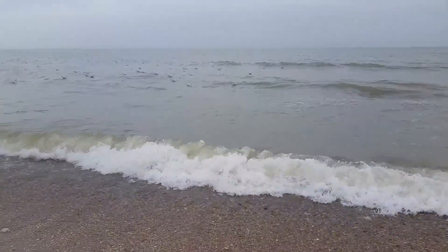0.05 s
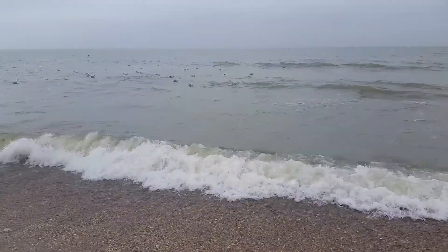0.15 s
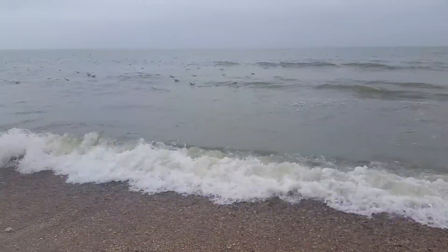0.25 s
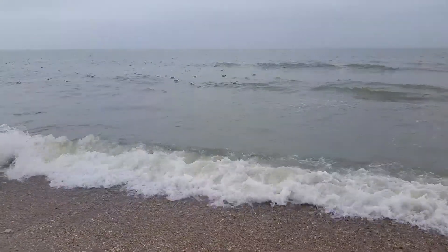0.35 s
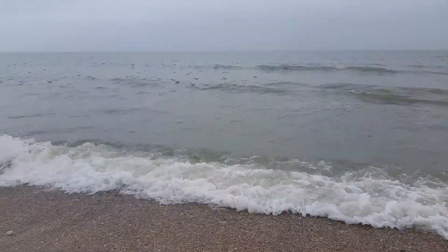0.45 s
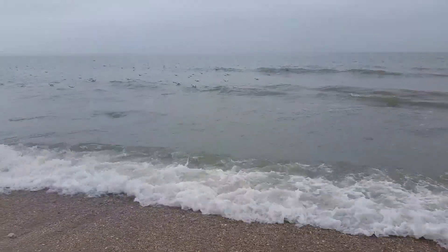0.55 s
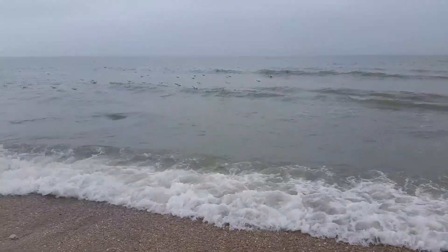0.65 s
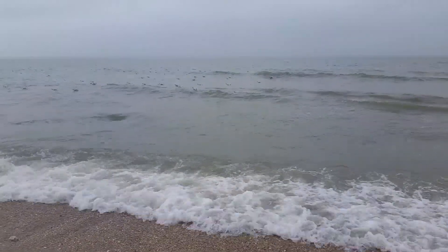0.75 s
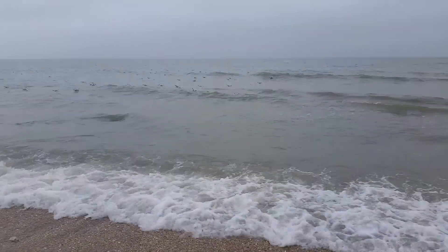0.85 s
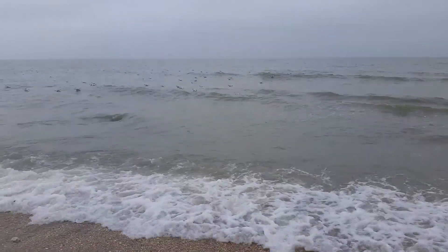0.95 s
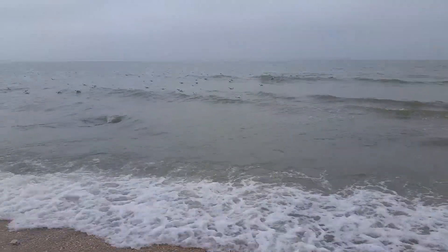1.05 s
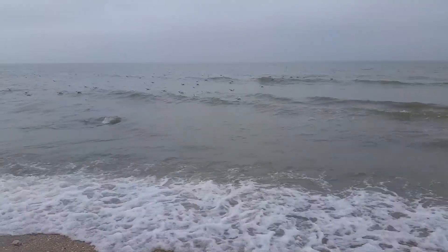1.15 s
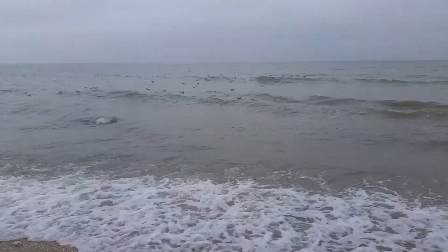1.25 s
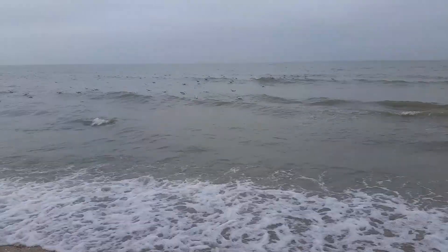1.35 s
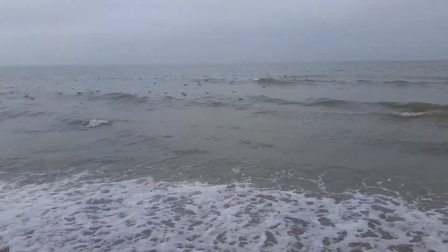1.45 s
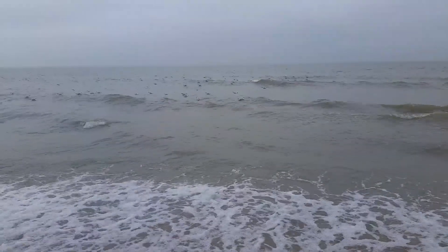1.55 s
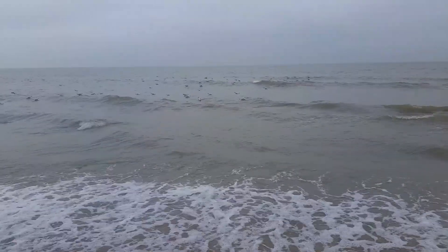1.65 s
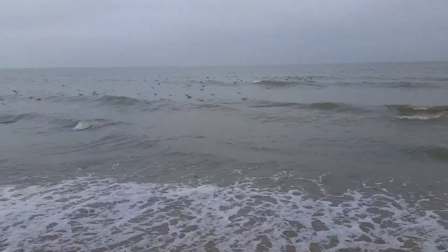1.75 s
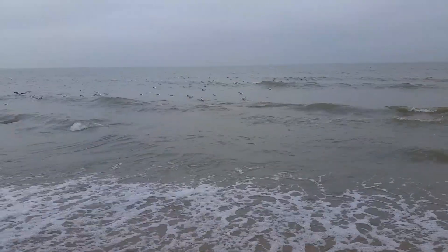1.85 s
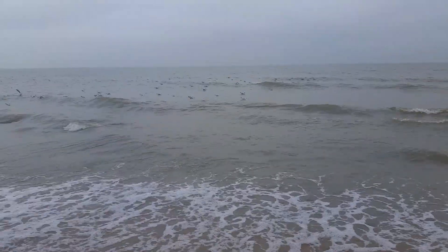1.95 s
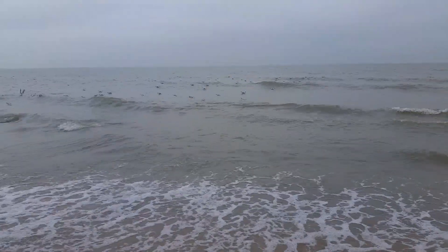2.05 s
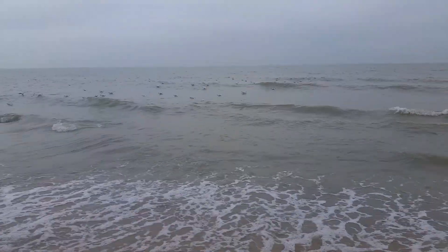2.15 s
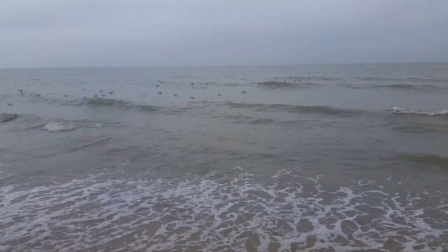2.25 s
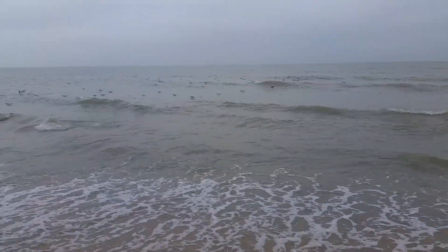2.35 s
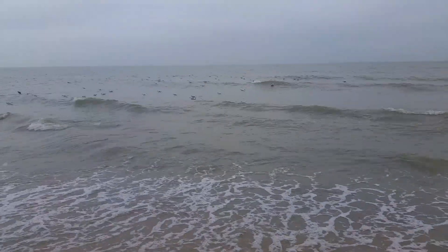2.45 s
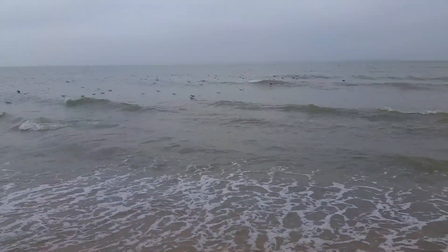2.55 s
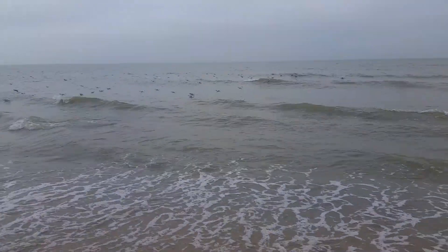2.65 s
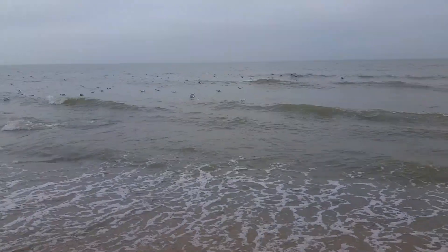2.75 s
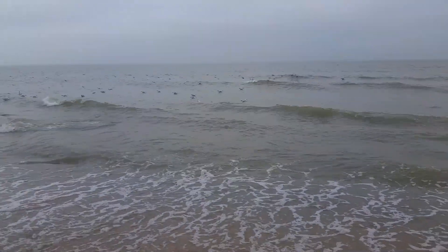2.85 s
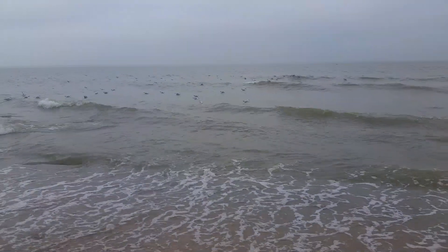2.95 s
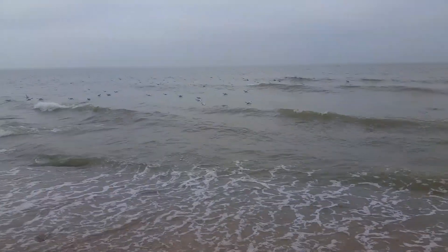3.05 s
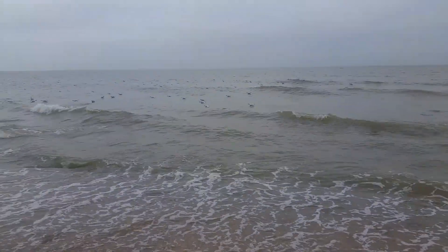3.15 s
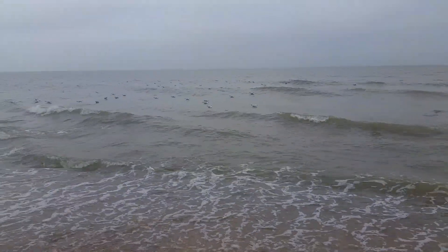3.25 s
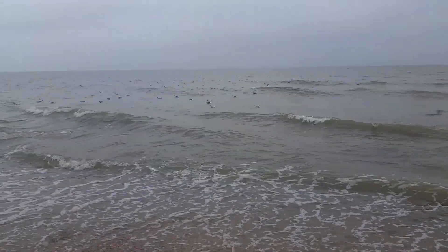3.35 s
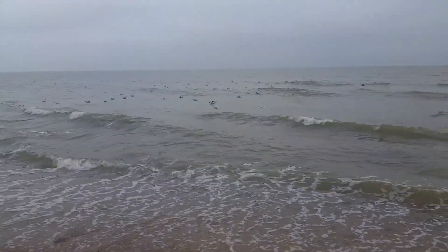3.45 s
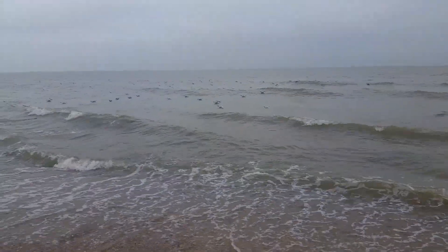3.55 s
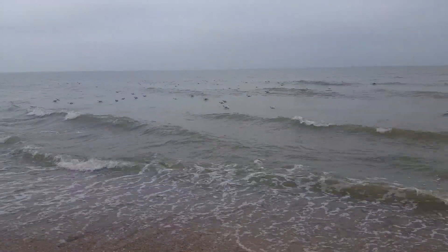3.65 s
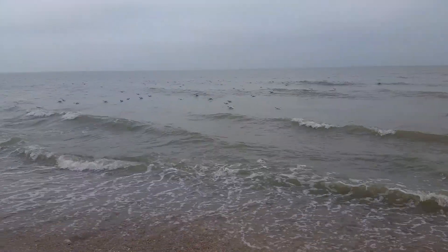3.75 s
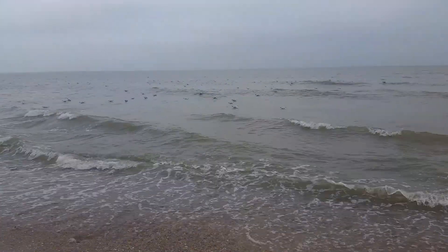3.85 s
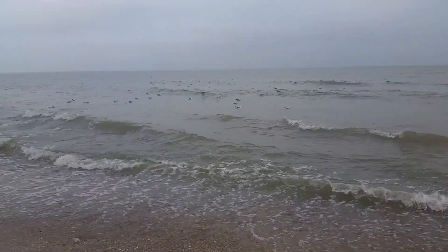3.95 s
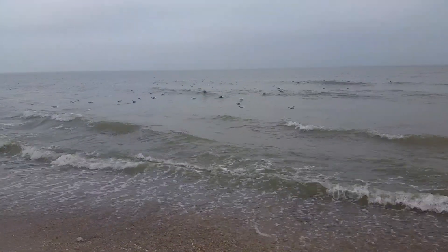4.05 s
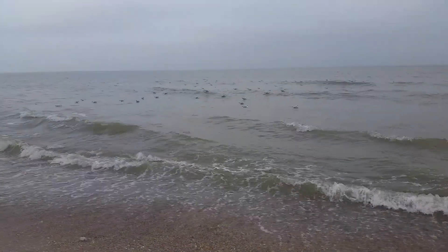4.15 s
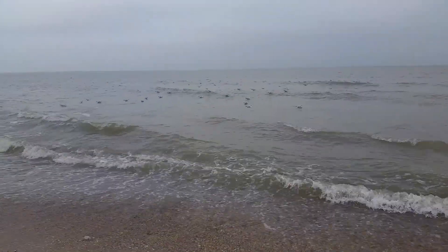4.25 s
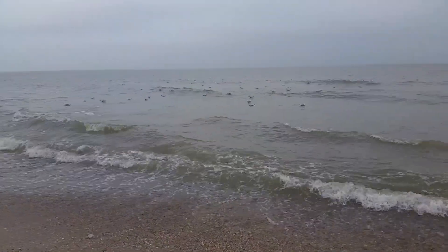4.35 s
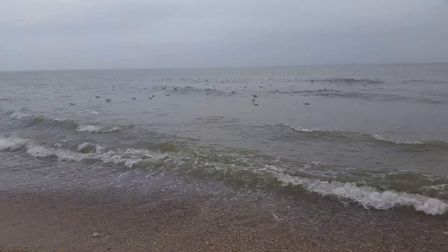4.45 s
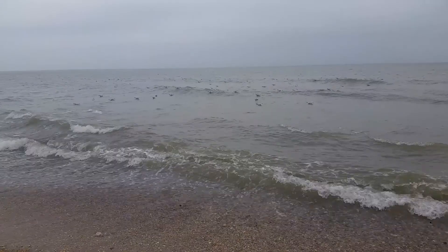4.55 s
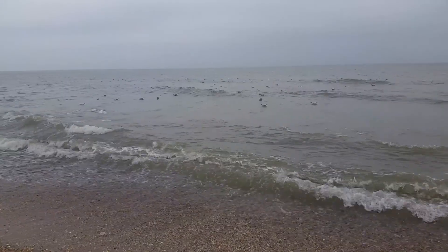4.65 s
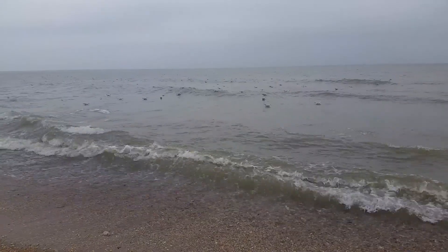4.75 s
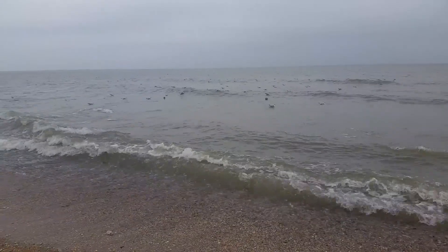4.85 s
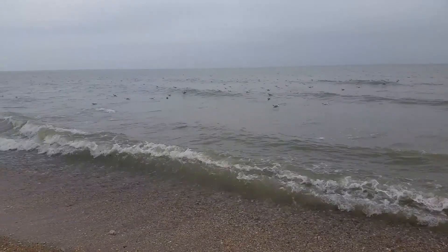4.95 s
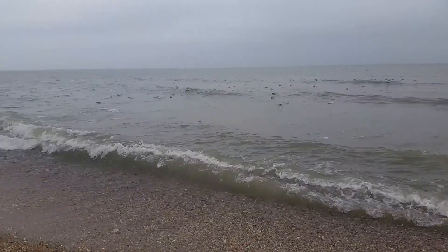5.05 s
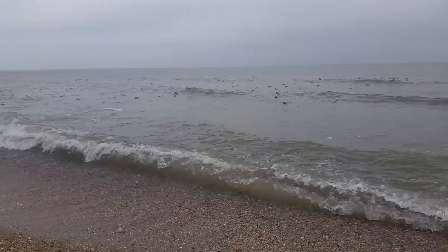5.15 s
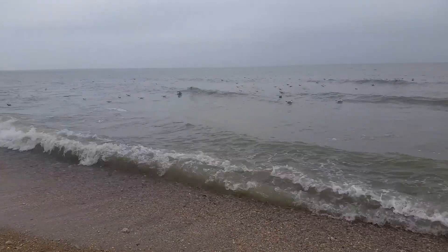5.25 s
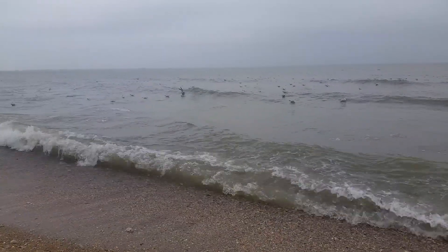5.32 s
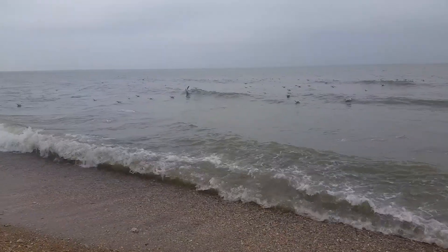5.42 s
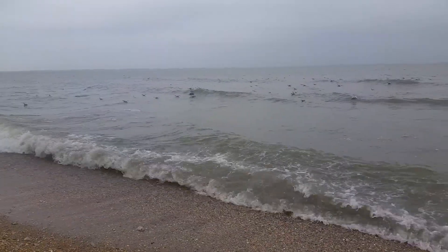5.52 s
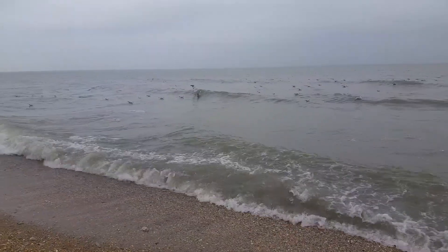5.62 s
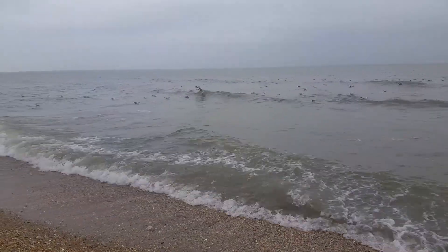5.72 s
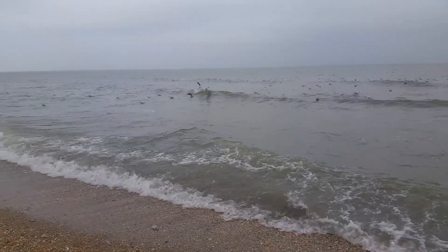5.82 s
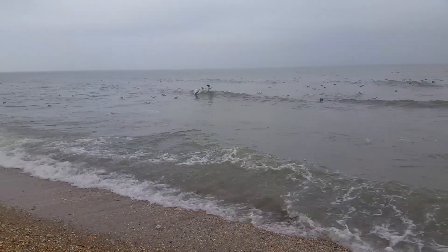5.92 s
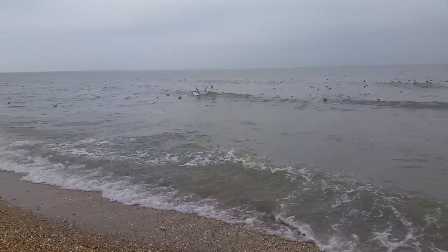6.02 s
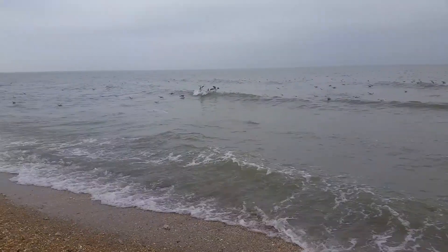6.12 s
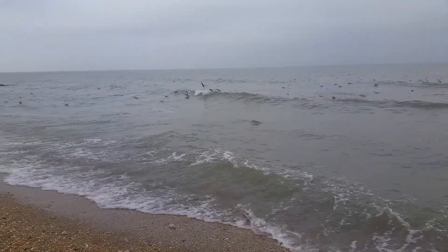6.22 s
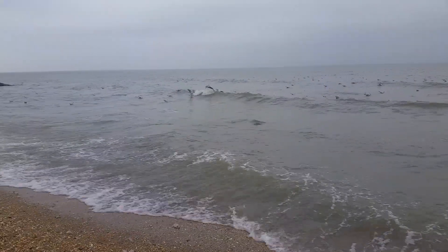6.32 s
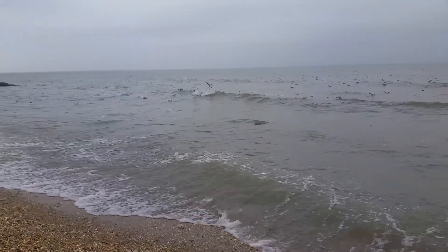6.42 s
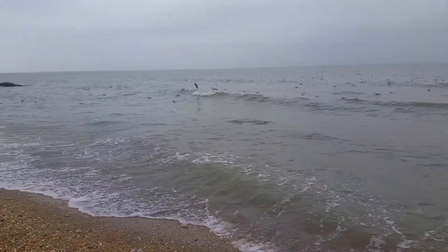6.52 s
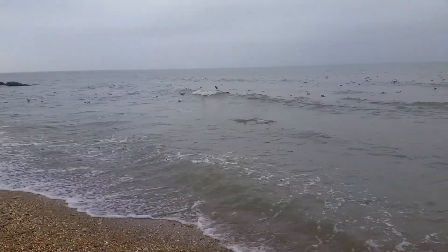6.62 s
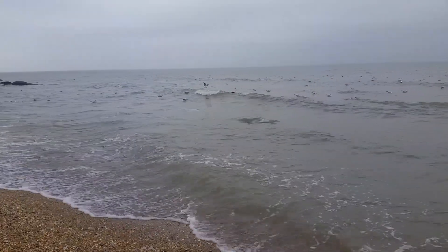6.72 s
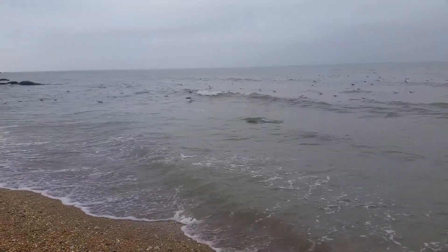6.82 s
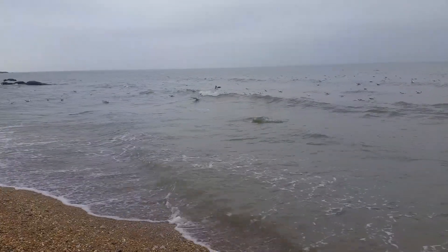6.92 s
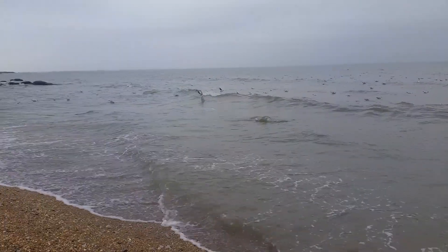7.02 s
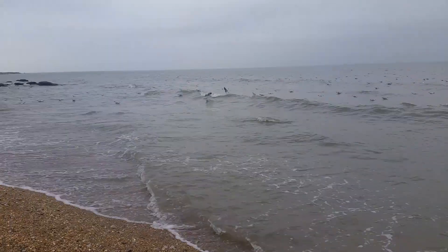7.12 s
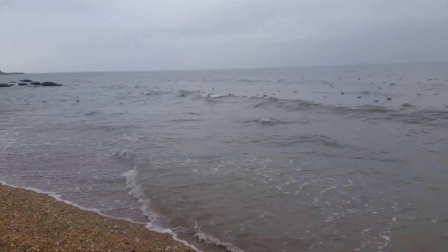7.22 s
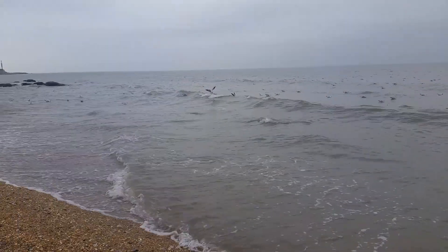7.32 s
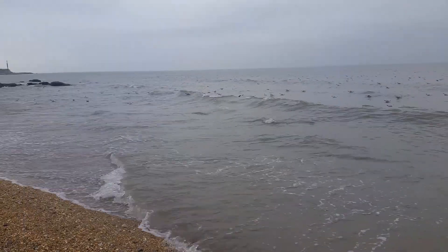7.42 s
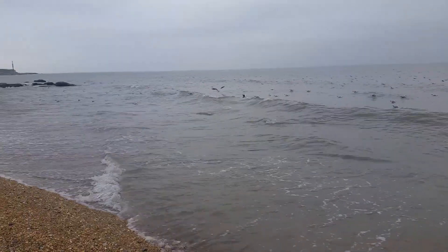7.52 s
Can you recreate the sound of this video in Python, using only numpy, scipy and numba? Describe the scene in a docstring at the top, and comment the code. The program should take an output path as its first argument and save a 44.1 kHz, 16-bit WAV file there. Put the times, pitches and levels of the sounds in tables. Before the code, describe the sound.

Small waves break on a shell and pebble beach, heard close on a hand-held phone. The first collapses with a low boom and splash, then runs out as fizzing foam. After a lull, a second builds and breaks, and a third laps in. Shells tick in the wash and gravel rattles as the water draws back. Wind rises in the second half, buffeting the microphone with low rumbles and thumps.

```python
"""Small waves break on a shell and pebble beach: one collapses and runs out as foam, a second builds
and breaks, a third laps in. Clouds of ringing bubbles roar, splash and fizz; shells tick in the swash
and gravel rattles as the water draws back. A hand-held phone hears it through two ports, the left one
muffled, while a rising wind buffets each port with its own eddies."""
import sys
import numpy as np
from scipy import signal
from scipy.fft import rfft, irfft, next_fast_len
from scipy.io import wavfile
from scipy.ndimage import uniform_filter1d, minimum_filter1d
from numba import njit

SR = 44100
rng = np.random.default_rng(int(sys.argv[2]) if len(sys.argv) > 2 else 0)


def to_wav(s):
    """Save 16-bit WAV."""
    ch = np.atleast_2d(s).T  # columns
    pcm = np.round(np.clip(ch, -1, 1) * 32767)  # PCM
    wavfile.write(sys.argv[1], SR, pcm.astype(np.int16))


N = 334278
LAPPING_DB = -47  # the calm water that the waves are set against


def surge(foam):
    """Decibels by which water or foam rises over the calm; each wave builds and ebbs exponentially."""
    # Waves reaching the shore. Each row: peak time in seconds, level in dB, build-up and run-out
    # time constants of the water in seconds, extra foam in dB.
    waves = [(.05, -34, 0.9, 0.78, 1.9), (.75, -43, 0.24, 0.19, 5), (4.25, -39, 0.9, .8, -2),
             (4.95, -40, 0.56, .9, -2.5), (5.7, -36.5, 0.74, 0.83, 0.5), (7.4, -39.5, 0.21, 0.92, 2.5)]
    foam_linger = 1.106
    power = 1
    for peak_s, db, build_s, run_out_s, foam_db in waves:
        if foam:
            db, run_out_s = db + foam_db, run_out_s * foam_linger
        age = np.arange(N) / SR - peak_s
        envelope = np.exp(np.minimum(age / build_s, -age / run_out_s))
        power = power + (undb(db - LAPPING_DB) * envelope) ** 2
    return 10 * np.log10(power)


def breakers(surge_db):
    """Big air pockets roar under the surf; smaller bubbles splash and plink where it tumbles."""
    # Tone of the deep churn. Each row: frequency in Hz, relative level in dB.
    roar_tone = [(40, -9.5), (90, -3), (150, -0.5), (230, 3), (330, 1.5), (450, -4.5), (650, -23.5),
                 (1000, -12.5), (2000, -59)]
    # Tone of the tumbling water. Each row: frequency in Hz, relative level in dB.
    splash_tone = [(150, -17), (350, -6), (550, 3), (800, 2), (1250, 1), (2000, -8), (3000, -13),
                   (5000, -29.5), (9000, -47)]
    roar = cloud(roar_tone, 56, 1240, cycles=5.66, spread_db=.55, glide=.14,
                 bearing=1, width=1.4, per_s=2400)
    splash = cloud(splash_tone, 213, 6000, cycles=14.3, spread_db=1.73, glide=.27,
                   bearing=.71, width=2.03, per_s=7000)
    plinks = cloud(splash_tone, 405, 3012, cycles=39, spread_db=1.5, glide=.039,
                   bearing=.69, width=1.26, per_s=600)
    roar_db = -34 + .29 * surge_db + .15 * wander(per_s=10)
    splash_db = LAPPING_DB + 4.5 + surge_db + 1.25 * wander(per_s=12)
    return roar * undb(roar_db) + (splash + undb(-7) * plinks) * undb(splash_db)


def plunges():
    """A crest falls on the shallows: trapped air booms while bubbles and spray crash."""
    # Plunging crests. Each row: peak time in seconds, crash in dB, boom in dB, half length in seconds.
    crests = [(.15, -35.5, -23, 0.17), (0.54, -33, -28.5, 0.31), (1.7, -54, -37, .2),
              (5.652, -37, -38, 0.047), (5.79, -30, -33, .11)]
    # Tone of the spray. Each row: frequency in Hz, relative level in dB.
    crash_tone = [(200, -52), (500, 1), (800, 0), (1200, 3.5), (1700, -10), (2600, -34), (4500, -6.5),
                  (6000, -13), (9000, -6.5), (13000, -29)]
    # Tone of the trapped air. Each row: frequency in Hz, relative level in dB.
    boom_tone = [(30, -25), (70, -11), (130, -2.5), (220, -2.5), (350, -8), (600, -13.5), (900, -25.5),
                 (1800, -47)]
    crash_gain = sum(undb(db) * swell(s, half_s) for s, db, _, half_s in crests)
    boom_gain = sum(undb(db) * swell(s, half_s) for s, _, db, half_s in crests)
    spray = cloud(crash_tone, 327, 14600, cycles=5.5, spread_db=2, glide=.11,
                  bearing=.61, width=1.6, per_s=9000)
    air = cloud(boom_tone, 60, 1380, cycles=3.15, spread_db=2.35, glide=.1,
                bearing=.25, width=1.1, per_s=2400)
    return crash_gain * spray + boom_gain * air


def swash(surge_db):
    """Foam bursts in tiny crackles, and shells tick when the water runs fast."""
    # Tone of foam and shells. Each row: frequency in Hz, relative level in dB.
    foam_tone = [(800, -18), (1800, 3.5), (3000, -1), (5000, 1.5), (8000, -2.5), (12000, -2), (16000, -11)]
    fizz = cloud(foam_tone, 1236, 16800, cycles=7.6, spread_db=.6, glide=.045,
                 bearing=.13, width=2.4, per_s=45000)
    shells = cloud(foam_tone, 4600, 18000, cycles=4.8, spread_db=-.5, glide=0,
                   bearing=.31, width=1.7, per_s=1000)
    flow_db = surge_db - 46.5
    fizz_db = flow_db + 3 + .73 * wander(per_s=60)
    return fizz * undb(fizz_db) + shells * undb(1.36 * flow_db - .5)


def backwash():
    """Gravel rattles down the slope as the water draws back."""
    # Pulls of the water. Each row: peak time in seconds, level in dB, half length in seconds.
    pulls = [(.6, -47.5, 3.3), (3.32, -49, 0.35), (4.896, -45, 0.3), (6.5, -44.5, 0.79)]
    # Tone of the gravel. Each row: frequency in Hz, relative level in dB.
    rattle_tone = [(900, -21), (1600, 0), (2300, 1.5), (2900, -1.5), (3500, -21), (6000, -24)]
    gravel = cloud(rattle_tone, 1194, 4430, cycles=25, spread_db=1.3, glide=0,
                   bearing=.9, width=1.56, per_s=4000)
    return gravel * sum(undb(db) * swell(s, half_s) for s, db, half_s in pulls)


def pebbles():
    """Nearby pebbles knock together in a crack only a few cycles long."""
    # Pebble knocks. Each row: start in seconds, strength in dB, pitch in Hz.
    knocks = [(7.064, -7, 7600)]
    start_s, db, hz = np.array(knocks, float).T.copy()
    start = (start_s * SR).astype(np.int64)
    return ring(start, np.zeros_like(start), hz, cycles=np.full(len(hz), 2.5), size=undb(db), glide=0.)


def wind():
    """Turbulence rumbles on each port separately; stronger gusts shed smaller, brighter eddies."""
    # The breeze lulls, then freshens. Each row: time in seconds, force in dB, left over right in dB.
    breeze = [(0, -30.5, -13.5), (.9, -48.5, -9), (1.45, -35.5, -7), (2.2, -41.5, -1.5), (3.5, -51, -10),
              (4.4, -40, 2.5), (4.95, -29.5, -4), (5.5, -23.5, 3), (5.8, -25, 6.5), (6.4, -23, 0),
              (6.9, -18, 5), (7.35, -22, 4), (7.58, -31.5, -5)]
    # Short, hard gusts. Each row: peak time in seconds, force in dB, port (0 left, 1 right).
    gusts = [(4.62, -22.5, 0), (4.91, -23, 1), (5.2, -18.5, 1), (5.37, -14.5, 1), (5.61, -13.5, 0),
             (6.03, -19.5, 0), (6.26, -18, 0), (6.41, -17, 0), (6.94, -13.5, 0), (7.24, -15.5, 0),
             (7.48, -18, 1)]
    # Tone of the large eddies. Each row: frequency in Hz, relative level in dB.
    buffet_tone = [(2, -43), (14, -30), (28, -9.5), (55, 2.5), (90, 3.5), (130, -2), (200, -13), (300, -35),
                   (500, -44), (1200, -85)]
    # Tone of the small eddies. Each row: frequency in Hz, relative level in dB.
    flutter_tone = [(50, -19), (130, 5.5), (200, -1), (300, -6), (450, -16.5), (800, -37), (2000, -70)]
    breeze_db, lean_db = curves(breeze)
    force = undb([breeze_db + side * lean_db / 2 + 2.5 * wander(per_s=20) for side in (1, -1)])
    for s, db, port in gusts:
        force[port] = np.hypot(force[port], undb(db) * swell(s, half_s=.03))
    force_db = 20 * np.log10(force)
    buffet = noise(buffet_tone) * undb(force_db + .5)
    flutter = noise(flutter_tone) * undb(1.077 * force_db - 4)
    return buffet + flutter


def puffs():
    """An eddy thumps a port with a dip in pressure; the microphone's bass roll-off swings it back."""
    # Single eddies. Each row: time in seconds, depth in dB, half length in ms, port (0 left, 1 right).
    eddies = [(0.589, -7.5, 4.6, 0), (0.684, -2.5, 2.4, 0), (1.136, -3.5, 1.66, 0), (1.267, -9.5, 1.8, 1),
              (1.364, -11, 2, 1), (2.096, -9, 2.2, 0), (4.561, -8.5, 1.06, 0), (4.622, -5, 2.6, 0),
              (5.628, 1, 7, 0), (6.936, -3.5, 1.4, 0), (7.083, -0.5, 1.1, 0), (7.252, 7.5, 7.2, 0)]
    t, pressure = np.arange(N) / SR, np.zeros((2, N))
    for s, db, half_ms, port in eddies:
        near = np.abs(t - s) < .05
        away = np.abs(t[near] - s) * 1000 / half_ms
        pressure[port, near] -= undb(db) * np.exp(-away ** 2.9)
    return signal.sosfilt(signal.butter(2, 46, "high", fs=SR, output="sos"), pressure)


def ports(sea):
    """Each port colours the sea: the left is muffled, the right has a bright top."""
    # Response of the left port. Each row: frequency in Hz, gain in dB.
    left_response = [(100, 0), (200, -4.5), (450, -4), (700, -6), (1200, -10.5), (2400, -10), (3400, -16.5),
                     (5000, -15), (6500, -27), (9500, -29.5), (13000, -15.5), (16000, -5)]
    # Response of the right port. Each row: frequency in Hz, gain in dB.
    right_response = [(1000, 1), (2350, 1), (2750, -1.5), (3400, -4.5), (4200, -5), (5300, -4),
                      (6400, -13.5), (8000, -13.5), (9700, -12), (11000, -1.5), (12300, 8.5), (13400, 16),
                      (14600, 16.5), (16000, 17.5)]
    return np.array([colour(sea[0], left_response), colour(sea[1], right_response)])


def cloud(tone, low_hz, high_hz, cycles, spread_db, glide, bearing, width, per_s):
    """Ringing grains scattered along the shore; bearing (to the right) and width are in radians."""
    when, pitch, damping, rank, rightward, leftward = rng.random((per_s * N // SR, 6)).T
    start = (when * N).astype(np.int64)
    hz = low_hz * (high_hz / low_hz) ** pitch
    # high grains die sooner, so they start stronger for an even spectrum
    size = hz * undb(-spread_db * np.log(np.maximum(rank, .002)))
    port_gap_s = .0005  # travel time from one port to the other
    angle = bearing + width * (rightward - leftward)
    lag = np.round(port_gap_s * SR * np.sin(angle)).astype(np.int64)
    grains = ring(start, lag, hz, cycles * (.5 + damping), size, float(glide))
    return unit(colour(grains - grains.mean(), tone))


@njit
def ring(start, lag, hz, cycles, size, glide):
    """Damped sines whose pitch rises by the fraction glide; the left port hears them lag samples late."""
    out = np.zeros((2, N))
    for k in range(len(start)):
        length = cycles[k] * SR / hz[k]
        turn = 2 * np.pi * hz[k] / SR
        pole = np.exp(-5 / length + 1j * turn)
        bend = np.exp(1j * turn * glide / length)
        phasor = size[k] + 0j
        for i in range(max(start[k], 0, -lag[k]), min(start[k] + int(length) + 1, N, N - lag[k])):
            out[0, i + lag[k]] += phasor.imag
            out[1, i] += phasor.imag
            phasor *= pole
            pole *= bend
    return out


def colour(x, tone):
    """Equalise with a curve drawn on a log-frequency axis."""
    hz, db = np.transpose(tone)
    size = next_fast_len(N + 4096)
    bin_hz = np.maximum(np.arange(size // 2 + 1) * SR / size, 1)
    gain = undb(np.interp(np.log(bin_hz), np.log(hz), db))
    return irfft(rfft(x, size) * gain, size)[..., :N]


def noise(tone):
    """Coloured noise, unrelated at the two ports."""
    return unit(colour(rng.standard_normal((2, N)), tone))


def wander(per_s):
    """A smooth random drift with per_s steps a second and an rms of one."""
    hold = SR // per_s
    steps = np.repeat(rng.standard_normal(N // hold + 1), hold)
    return unit(uniform_filter1d(uniform_filter1d(steps, hold), hold)[:N])


def swell(peak_s, half_s):
    """A bell-shaped rise and fall around a moment."""
    return np.exp(-.5 * ((np.arange(N) / SR - peak_s) / half_s) ** 2)


def curves(table):
    """Each column of a timed table as an automation curve."""
    times, *columns = np.transpose(table)
    return np.array([np.interp(np.arange(N) / SR, times, column) for column in columns])


def undb(db):
    """Decibels to gain."""
    return 10 ** (np.asarray(db) / 20)


def unit(x):
    """Scale to an rms of one."""
    return x / np.sqrt(np.mean(x ** 2))


def limiter(x, ceiling_db, release_s):
    """Both channels duck just ahead of a peak over the ceiling, then recover."""
    peak_db = 20 * np.log10(np.abs(x).max(axis=0) + 1e-9)
    over_db = np.maximum(peak_db - ceiling_db, 1e-9)
    fall = np.arange(N) / SR / release_s
    duck_db = np.exp(np.maximum.accumulate(np.log(over_db) + fall) - fall)
    return x * uniform_filter1d(minimum_filter1d(undb(-duck_db), size=301), size=301)


def scene():
    """The surge drives breakers and foam; both ports hear the sea while the wind blows straight on them."""
    sea = breakers(surge(foam=False)) + plunges() + swash(surge(foam=True)) + backwash() + pebbles()
    return ports(sea) + wind() + puffs()


def record(dry):
    """The phone adds a faint hiss, ducks under the strongest gusts and cuts the top."""
    # Tone of the microphone's hiss. Each row: frequency in Hz, relative level in dB.
    hiss_tone = [(1000, -2.5), (3300, -1), (4000, 0), (4600, 8), (5200, -3), (6200, -57), (8000, -37),
                 (9700, -25), (11500, -10), (16000, -20)]
    limited = limiter(dry + undb(-55.5) * noise(hiss_tone), ceiling_db=-1.3, release_s=.06)
    top_hz = 15900
    return signal.sosfilt(signal.ellip(12, .1, 80, top_hz, fs=SR, output="sos"), limited)


dry = scene()
out = record(dry)
to_wav(out)
```